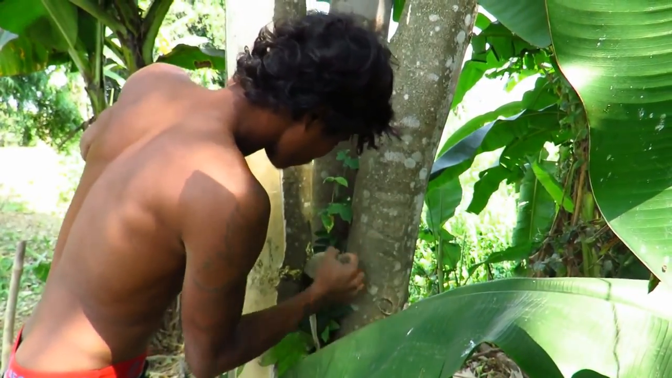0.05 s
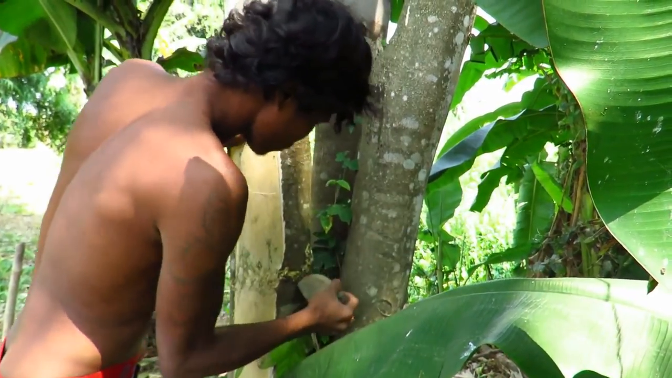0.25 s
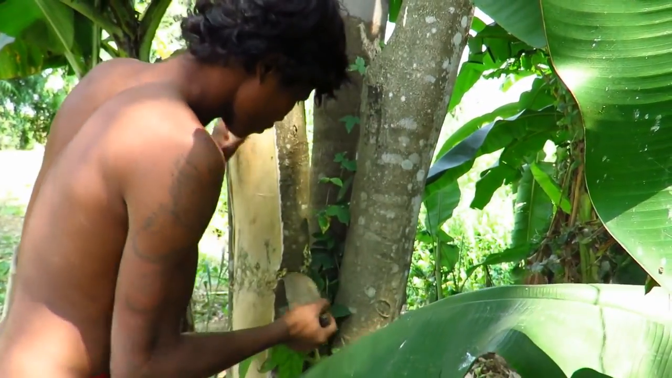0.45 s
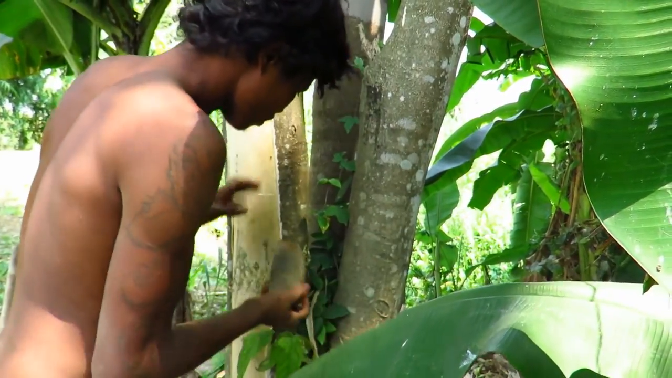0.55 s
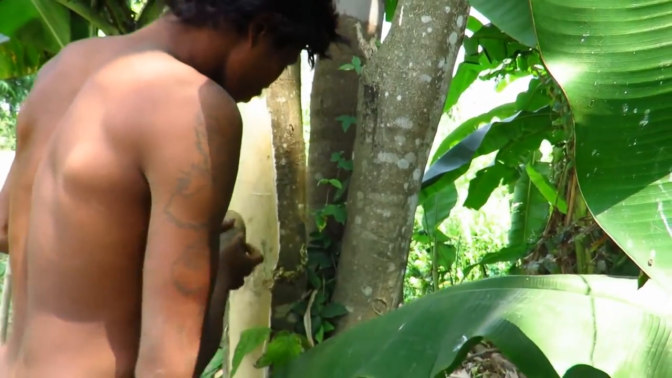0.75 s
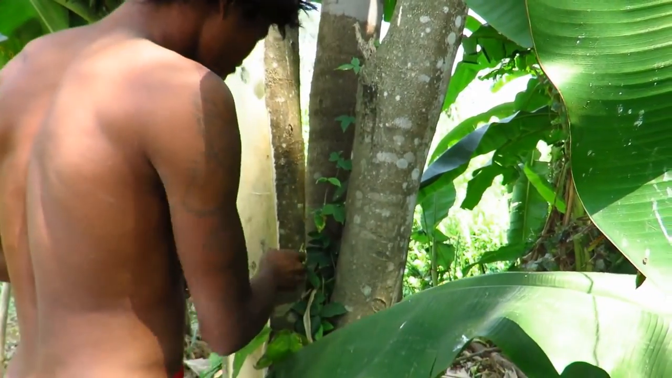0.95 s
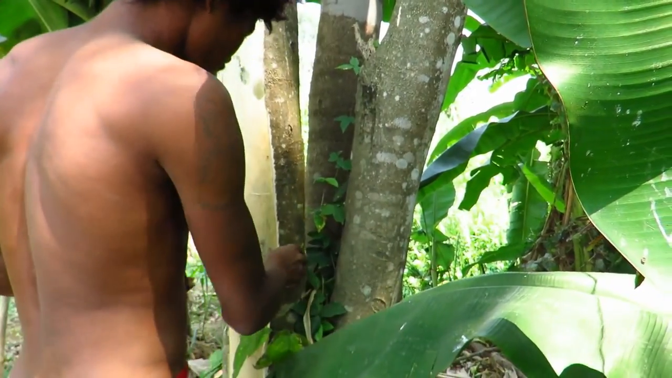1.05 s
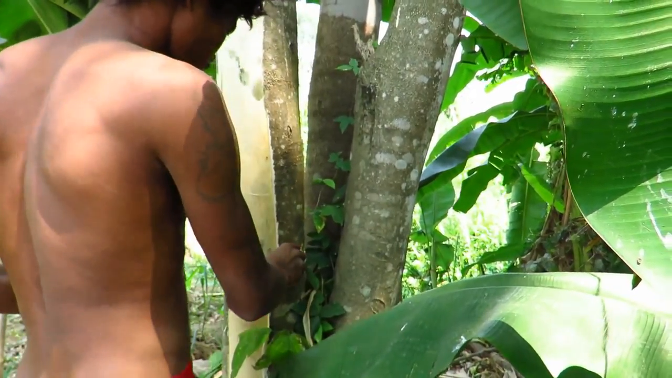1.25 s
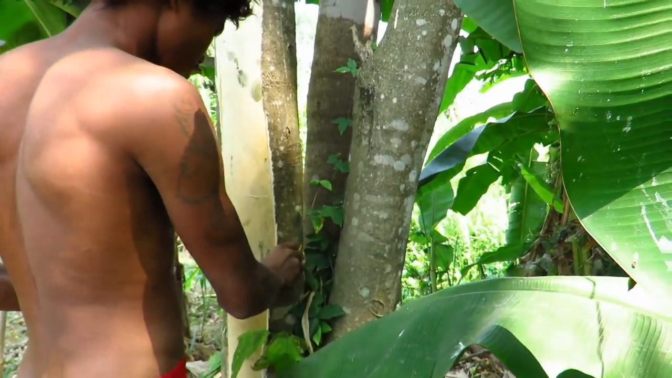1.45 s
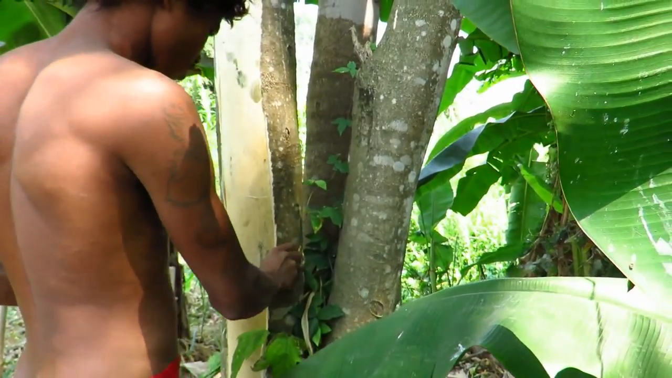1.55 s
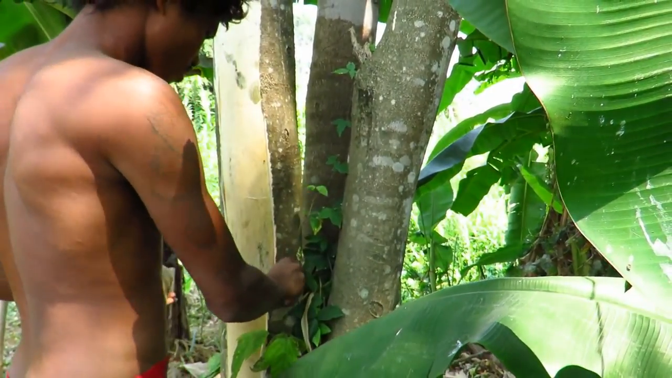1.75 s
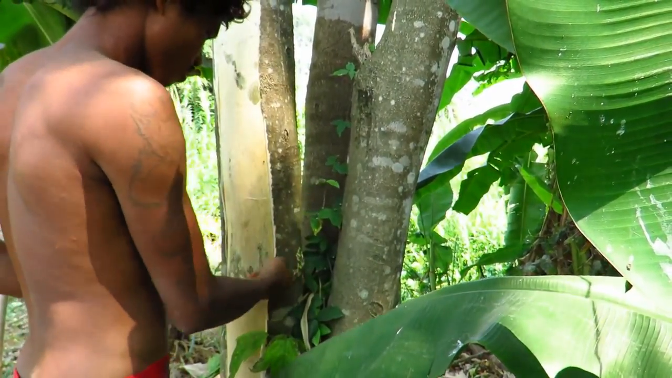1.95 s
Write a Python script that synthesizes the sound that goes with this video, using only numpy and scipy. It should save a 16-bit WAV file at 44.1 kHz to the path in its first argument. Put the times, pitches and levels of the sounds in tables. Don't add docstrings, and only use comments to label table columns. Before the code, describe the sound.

Single stone blow on a young trunk, followed by a crackling, rasping rip of bark

```python
import sys
import numpy as np
from scipy import signal
from scipy.fft import rfft, irfft, next_fast_len
from scipy.io import wavfile
from scipy.ndimage import uniform_filter1d, map_coordinates

SR = 44100
rng = np.random.default_rng(int(sys.argv[2]) if len(sys.argv) > 2 else 0)


def bounce(signal):
    frames = np.transpose(np.atleast_2d(signal))
    limited = np.clip(frames, -1, 1)
    pcm = np.round(limited * 32767).astype(np.int16)
    wavfile.write(sys.argv[1], SR, pcm)


def gain_from_db(level_db):
    decades = np.asarray(level_db, float) / 20
    return 10 ** decades


N = 85995

# pitch in Hz, level in dB, time to fade by 60 dB in seconds.
THUD_TONES = [(92.6, -9, 0.18), (201, -2.5, 0.033), (264, 9, 0.038), (328, 0.5, 0.032)]
# pitch in Hz, level in dB, 60 dB fade in seconds.
EDGE_TONES = [(592.5, -7.5, 0.053), (662, -13, 0.04), (805, -33, 0.035), (920, -21.5, 0.024),
              (1070, -17, 0.03), (1370, -30.5, 0.06)]
# pitch in Hz, level in dB, 60 dB fade in seconds.
RING_TONES = [(85, -24, 0.21), (110, -18.5, 0.16), (150.3, -25.5, 0.31), (190, -25.5, 0.35),
              (250.2, -24.5, 0.29), (301.8, -22, 0.29), (352, -27.5, 0.3), (450, -24, 0.14),
              (613, -19.5, 0.075), (840, -30.5, 0.12), (1160, -43, 0.19)]
# pitch in Hz, level in dB, 60 dB fade in seconds.
STONE_TONES = [(3650, -10, .011), (3000, -14, .012), (4300, -16, .01), (5300, -32, .04), (3350, -14, .01),
               (2500, -22, .012)]
# frequency in Hz, level in dB per Hz.
CRACK_COLOUR = [(880, 2), (1500, -1), (2030, -23), (3690, -4.5), (4890, -18), (6430, -21.5), (11200, -12.5),
                (14600, -18), (15500, -24)]
# frequency in Hz, level in dB per Hz.
SPLINTER_COLOUR = [(300, -37), (700, 4), (2500, -1.5), (4200, -9), (6000, -17), (14500, -44), (15800, -73)]
# time in seconds, level in dB.
PULL_LEVEL = [(.45, -70), (.485, -51), (.512, -47), (.54, -43), (.62, -42), (.636, -36.5), (.67, -34.5),
              (.706, -39.5), (.716, -51), (.75, -40.5), (.77, -50.5), (.8, -46.5), (.84, -51.5),
              (.843, -33.5), (.859, -45), (.863, -45.5), (.944, -59.5), (.947, -45.5), (.99, -61),
              (1.03, -73)]
# frequency in Hz, level in dB per Hz.
BARK_COLOUR = [(180, -55), (300, -0.5), (863, -1.5), (1810, -1.5), (2070, -3), (3690, -1), (4000, -3),
               (12500, -16.5), (15500, -27.5)]
# start in seconds, peak in dB, pitch in Hz, 60 dB fade in seconds.
FIBRE_SNAPS = [(0.5082, -30, 2950, .006), (0.5459, -28.5, 1060, 0.016), (0.552, -28, 1716, 0.0075),
               (0.603, -31, 5800, 0.0051), (0.6062, -30, 1020, 0.0023), (.6318, -21.5, 830, 0.011),
               (0.6324, -22, 6270, 0.0046), (0.6333, -29.5, 8600, 0.007), (0.637, -27, 203, 0.053),
               (.633, -38, 450, 0.018), (.642, -43, 318, 0.079), (.7025, -28.5, 2970, 0.012),
               (.759, -32, 3600, .008), (1.778, -47, 5230, .01), (.654, -35, 1960, 0.0019),
               (0.786, -33, 2460, .006), (0.842, -25, 3440, 0.0071), (.845, -29, 5000, 0.0036),
               (0.8481, -33.5, 2800, 0.037), (0.8553, -25, 3120, 0.012), (0.9466, -36, 2750, .007),
               (.958, -41, 2260, 0.016)]
# frequency in Hz, level in dB per Hz.
SPLIT_COLOUR = [(100, -36), (800, 4), (3000, -29), (6000, -9), (9000, -9), (14500, -24), (15800, -60)]
# time in seconds, level in dB.
RASP_LEVEL = [(.46, -64), (.5, -50), (.545, -42), (.6, -54.5), (.64, -42.5), (.7, -53), (.72, -67),
              (.9, -76), (1.0, -87)]
# frequency in Hz, level in dB per Hz.
WOOD_COLOUR = [(250, -44), (600, -2.5), (1100, -4), (1900, -10.5), (3500, -13), (15000, -68)]
# frequency in Hz, level in dB per Hz.
FOREST_COLOUR = [(25, 7.5), (60, -2), (150, 5), (1000, -3), (3000, -11.5), (5700, -18), (8500, -25),
                 (13500, -30.5), (15000, -46)]
# time in seconds, level in dB.
BRUSH_LEVEL = [
    (1.64, -85),
    (1.69, -61),
    (1.72, -58),
    (1.738, -53),
    (1.76, -59),
    (1.81, -79),
]
# frequency in Hz, level in dB per Hz.
LEAF_COLOUR = [(400, -56), (800, 5), (2000, 9), (5000, 0), (9000, -3), (13500, -5), (15300, -13),
               (15800, -60)]
# frequency in Hz, likeness from -1 to 1.
NEAR_LIKENESS = [(60, 0.59), (240, 0.6), (950, 1), (3770, 1), (15000, 0.41)]
# frequency in Hz, likeness from -1 to 1.
FAR_LIKENESS = [(60, 1), (180, -0.61), (550, 0.18), (1650, 0.29), (4970, 0.8), (15000, -0.047)]
# time in seconds, gain in dB.
SLOW_GAIN = [(0, 0), (.1, 1), (.196, 1), (.206, -6), (.3, -3), (.42, -3.5), (.52, -0.5), (.9, 0.5),
             (1.95, 0.5)]
# time in seconds, gain in dB.
LIMITER_GAIN = [
    (.1975, 0),
    (.2, -16),
    (.2028, -16),
    (.2036, 0),
]

BLOW_S, BLOW_DB, BLOW_PAN_DB, BLOW_SIDE_DB = 0.2078, 5, -1, -27
RISE_S, CONTACT_S, LIFT_S = 0.0045, 0.0116, 0.0006
BITE_S = 0.00044
WANDER_RAD, WANDER_HZ = 1.1, 40
MUTE_S, MUTE_DB, MUTE_WIDE_S = 0.058, -13, 0.002
CRACK_S, CRACK_WIDE_S, CRACK_DB = 0.2098, 0.0013, -13.5
SPLINTER_DB, SPLINTER_T60_S = -26, 0.075
STONE_S = 0.2091
SPLIT_S, SPLIT_DB, SPLIT_T60_S = 0.6312, -29, 0.022
FIBRE_HZ, FIBRE_OCTAVES, FIBRE_CYCLES, FIBRE_SPREAD_DB = 2666, 1.327, 7.6, 3.5
FIBRE_DB = -6
SNAP_RISE = 5.2
FOREST_DB = -49
CICADA_HZ, CICADA_WIDE_HZ, CICADA_DB, BUZZ_HZ, BUZZ_DB = 6700, 430, -60, 131.8, 1.5


def blow():
    time = np.arange(N) / SR
    t = np.maximum(time - BLOW_S, 0)
    lifted = switch(t, CONTACT_S, LIFT_S)
    thud = modes(THUD_TONES, t) + modes(EDGE_TONES, np.maximum(t - BITE_S, 0))
    push = 1 - np.exp(-t / RISE_S)
    wood = gain_from_db(BLOW_DB) * push * ((1 - lifted) * thud + lifted * free_ring(t))
    side = gain_from_db(BLOW_SIDE_DB) * np.roll(wood, 40)
    trunk = wood * gain_from_db([[BLOW_PAN_DB / 2], [-BLOW_PAN_DB / 2]]) + [side, -side]

    burst = np.exp(-0.5 * ((time - CRACK_S) / CRACK_WIDE_S) ** 2)
    crack = gain_from_db(CRACK_DB) * burst * spread(hiss(), CRACK_COLOUR, NEAR_LIKENESS)
    fade = (t > 0) * gain_from_db(SPLINTER_DB - 60 * t / SPLINTER_T60_S)
    splinters = fade * spread(hiss(), SPLINTER_COLOUR, NEAR_LIKENESS)
    since_click = np.maximum(time - STONE_S, 0)
    click = modes(STONE_TONES, since_click) * (1 - np.exp(-since_click / 0.0012))
    return trunk + crack + splinters + click


def free_ring(t):
    mute_db = MUTE_DB * switch(t, MUTE_S, MUTE_WIDE_S)
    ring = np.zeros(N)
    for hz, db, t60 in RING_TONES:
        level = gain_from_db(db - 60 * t / t60 + (hz > 170) * mute_db)
        ring += level * np.sin(2 * np.pi * hz * t + WANDER_RAD * wobble(WANDER_HZ))
    return ring


def bark():
    grain = np.array([fibres(count=6000), fibres(count=6000)])
    clumps = gain_from_db(1.84 * wobble(60.3) + 0.73 * wobble(220))
    friction = unit(patchy(patchy_db=-1.5))
    breaking = clumps * (friction + gain_from_db(FIBRE_DB) * grain)
    tear = gain_from_db(curve(PULL_LEVEL)) * spread(breaking, BARK_COLOUR, NEAR_LIKENESS)

    since = np.arange(N) / SR - SPLIT_S
    fade = (since > 0) * gain_from_db(SPLIT_DB - 60 * abs(since) / SPLIT_T60_S)
    split = fade * spread(hiss(), SPLIT_COLOUR, NEAR_LIKENESS)
    scrapes = np.array([fibres(count=2500), fibres(count=2500)])
    rasp = gain_from_db(curve(RASP_LEVEL)) * spread(scrapes, WOOD_COLOUR, NEAR_LIKENESS)
    return tear + snaps() + split + rasp


def snaps():
    t = np.arange(SR // 8) / SR
    out = np.zeros(N)
    for s, db, hz, t60 in FIBRE_SNAPS:
        rough = 1 + 0.083 * rng.standard_normal(len(t))
        rise = 1 - np.exp(-t * hz * SNAP_RISE)
        out[round(s * SR):][:len(t)] += modes([(hz, db, t60)], t) * rise * rough
    return out


def fibres(count):
    when, pitch = rng.random(count), rng.standard_normal(count)
    size = np.minimum(rng.exponential(size=count), 3)[:, None]
    hz = np.clip(FIBRE_HZ * 2 ** (FIBRE_OCTAVES * pitch), 300, 15000)[:, None]
    k = np.arange(400)
    level = gain_from_db(FIBRE_SPREAD_DB * size - 20 * k / SR * hz / FIBRE_CYCLES)
    grains = level * np.sin(2 * np.pi * hz * k / SR) * hz / FIBRE_HZ
    place = (when * N).astype(int)[:, None] + k
    return unit(np.bincount(place.ravel(), grains.ravel(), minlength=N)[:N])


def forest():
    swell_db = 0.3 * wobble(3) + 0.5 * wobble(25)
    rustle = gain_from_db(FOREST_DB + swell_db) * spread(patchy(patchy_db=1.65), FOREST_COLOUR, FAR_LIKENESS)
    leaf_db = curve(BRUSH_LEVEL) + 2.5 * wobble(150)
    leaf = gain_from_db(leaf_db) * spread(patchy(patchy_db=1.5), LEAF_COLOUR, NEAR_LIKENESS)
    return rustle + cicadas() + leaf


def cicadas():
    def band(hz):
        return np.exp(-0.5 * ((hz - CICADA_HZ) / CICADA_WIDE_HZ) ** 2)

    flat = [(1000, 0)]
    song = unit(filtered(spread(patchy(patchy_db=-1.0), flat, FAR_LIKENESS), band))
    return gain_from_db(CICADA_DB + BUZZ_DB * wobble(BUZZ_HZ) + 0.7 * wobble(18)) * song


def modes(table, t):
    return sum(gain_from_db(db - 60 * t / t60) * np.sin(2 * np.pi * hz * t) for hz, db, t60 in table)


def switch(t, s, wide):
    return 1 / (1 + np.exp(np.clip((s - t) / wide, -50, 50)))


def hiss():
    return rng.standard_normal((2, N))


def patchy(patchy_db):
    z = signal.stft(hiss(), nperseg=512)[2]
    field = uniform_filter1d(rng.standard_normal(z.shape[1:]), size=3, axis=0)
    field = uniform_filter1d(field, size=8, axis=1)
    gain = gain_from_db(patchy_db * np.clip(unit(field), -2, 2))
    return signal.istft(z * gain, nperseg=512)[1][:, :N]


def spread(pair, colour, alike):
    def mid_side(hz):
        turn = np.arccos(np.clip(along(alike, hz), -1, 1)) / 2
        return gain_from_db(along(colour, hz)) * [np.cos(turn), np.sin(turn)]

    mid, side = filtered(pair, mid_side)
    return unit(np.array([mid + side, mid - side]))


def filtered(x, response):
    m = next_fast_len(N + SR // 2)
    return irfft(rfft(x, m) * response(np.fft.rfftfreq(m, 1 / SR)), m)[..., :N]


def wobble(rate):
    knots = rng.standard_normal(int(N * 400 / SR) + 4)
    return map_coordinates(knots, [np.arange(N) * min(rate, 390) / SR])


def curve(rows):
    s, v = np.transpose(rows)
    return np.interp(np.arange(N) / SR, s, v)


def along(points, hz):
    f, v = np.transpose(points)
    return np.interp(np.log(hz + 1), np.log(f + 1), v)


def unit(x):
    return x / np.sqrt(np.mean(x ** 2) + 1e-20)


def scene():
    return blow() + bark() + forest()


def roll_off(x):
    return signal.sosfilt(signal.butter(12, 15760, fs=SR, output="sos"), x)


def record(dry):
    def response(hz):
        low_cut = (1j * hz / (50 + 1j * hz)) ** 2
        return (hz < 15700) * low_cut

    mix = filtered(dry * gain_from_db(curve(SLOW_GAIN) + curve(LIMITER_GAIN)), response)
    return roll_off(mix)


dry = scene()
out = record(dry)
bounce(out)
```